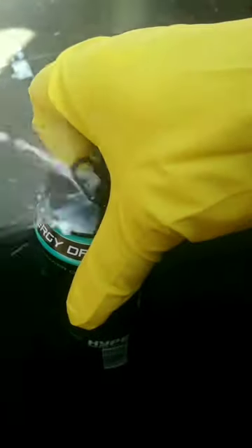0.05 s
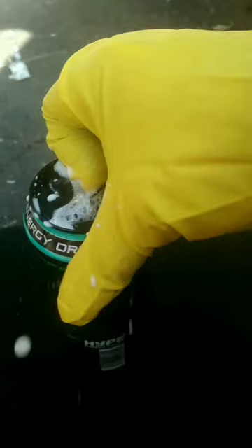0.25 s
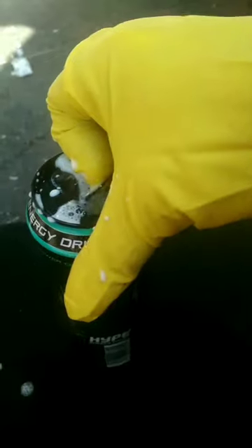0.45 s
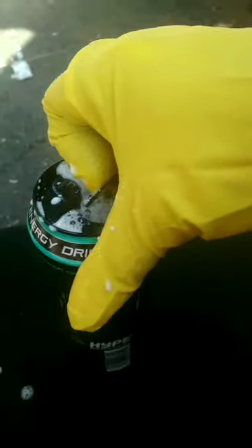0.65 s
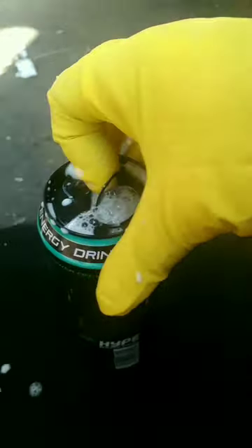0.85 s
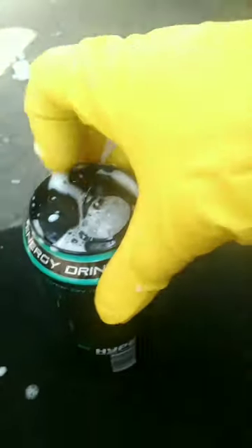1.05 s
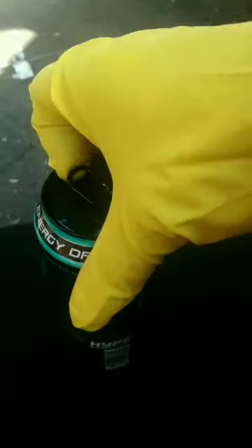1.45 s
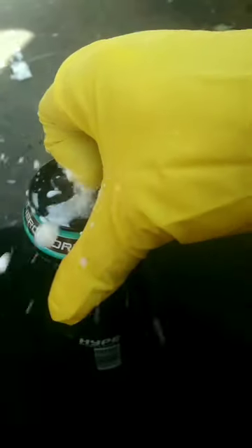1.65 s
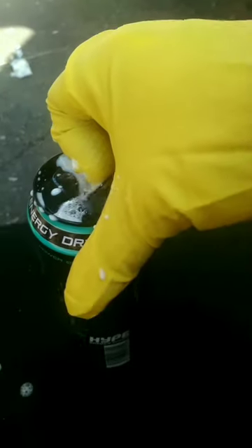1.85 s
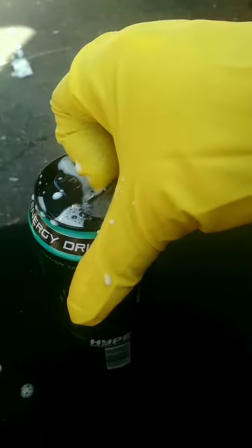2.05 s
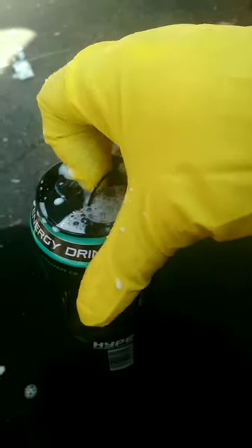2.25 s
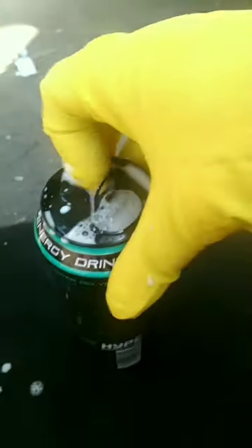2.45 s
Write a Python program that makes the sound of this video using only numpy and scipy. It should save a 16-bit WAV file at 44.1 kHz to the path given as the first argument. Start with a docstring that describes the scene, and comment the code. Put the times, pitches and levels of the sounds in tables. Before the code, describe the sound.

A drink can cracks open close to the microphone at about 0.2 seconds. Gas hisses out and buffets the microphone for a tenth of a second, and the tab gives way with a hollow knock and a tick around 0.3 seconds. Foam then fizzes faintly on the lid. The same opening repeats at about 1.7 seconds, followed by more soft fizz, over a faint low room hum.

```python
"""A low hum and faint room air, then a sharp crack: a gloved hand opens a can of fizzy drink close to
the microphone. The seal snaps, gas hisses through the slit and buffets both microphone ports for a
tenth of a second, and the tab gives way with a hollow knock and a tick. Foam then fizzes on the lid,
with a few faint hollow swells farther back in the room. The same opening is heard twice in a row."""
import sys
import numpy as np
from scipy import signal
from scipy.fft import rfft, irfft
from scipy.io import wavfile

SR = 44100
rng = np.random.default_rng(int(sys.argv[2]) if len(sys.argv) > 2 else 0)


def to_wav(s):
    """Save 16-bit WAV."""
    ch = np.atleast_2d(s).T  # columns
    pcm = np.round(np.clip(ch, -1, 1) * 32767)  # PCM
    wavfile.write(sys.argv[1], SR, pcm.astype(np.int16))


N = 114660
T = np.arange(N) / SR
HZ = np.fft.rfftfreq(N, 1 / SR)

# air of the room (frequency [Hz], level [dB])
AIR_SPECTRUM = [(20, 4.5), (70, 4), (130, 8), (250, -2.5), (600, -7.5), (1200, -18.5), (3000, -24)]
# how alike that air is at the two ports (frequency [Hz], correlation [0-1])
AIR_LIKENESS = [(60, 0.94), (300, 0.75), (650, 0.66), (1400, 0.86), (15000, 0.45)]
# the microphone's own hiss (frequency [Hz], level [dB])
MIC_SPECTRUM = [(1000, -8), (2800, -18), (4800, -12), (7000, -8), (9500, 0), (11200, 0), (12500, -6),
                (13700, -13), (15500, -20)]
# hollow swells back in the room (centre [s], half length [s], level [dB], pitch [Hz], glide [Hz/s])
ROOM_SWELLS = [(0.77, .022, -61, 388, 500), (0.81, .022, -63, 590, 900), (0.845, .04, -58, 425, 0),
               (0.915, .033, -54.5, 345, 0), (0.9, .04, -58, 625, 200), (0.87, .028, -62, 690, 300),
               (0.98, .035, -61, 685, -200), (1.08, .03, -66, 350, 0), (1.375, .018, -60, 345, -500),
               (1.42, .016, -59, 290, 0), (1.41, .025, -64, 420, 0)]
# low hum of the room (time [s], level [dB])
HUM_LEVELS = [(0, -71), (0.1, -54.5), (0.2, -56), (0.4, -51), (0.65, -52.5), (0.75, -65), (0.85, -54.5),
              (1.0, -56), (1.08, -67), (1.17, -60.5), (1.24, -63), (1.32, -59.5), (1.51, -58.5)]
# low tone that sinks after the burst (time [s], pitch [Hz], level [dB])
DRONE_PATH = [(0.33, 130, -56), (0.39, 128.3, -55), (0.44, 128, -53), (0.5, 128.5, -48), (0.55, 121.6, -57),
              (0.59, 100.2, -60), (0.72, 93, -63), (0.8, 88, -85)]
# foam on the lid (time [s], level [dB])
FOAM_LEVELS = [(0.2, -90), (0.3, -64), (0.48, -61.5), (0.62, -61.5), (0.82, -59.5), (0.92, -53),
               (1.0, -54.5), (1.11, -52), (1.22, -55), (1.32, -54.5), (1.42, -57.5), (1.51, -60)]
# its bursting bubbles (frequency [Hz], level [dB])
FOAM_SPECTRUM = [(300, -7), (700, -4), (1400, -1), (2200, -9), (3100, -14), (4500, -10), (7000, -9),
                 (9500, 0), (11500, 2), (13000, -3), (15000, -5), (15600, -12)]
# air pushing the diaphragms (centre [s], half length [s], pitch [Hz], level [dB], left-right [dB])
AIR_PUFFS = [(0.209, 0.0058, 90, -31, -14), (0.253, 0.008, 185, -32, -6), (0.282, 0.0055, 86, -27.5, -7)]
# resonances of the can and the cupped hand (frequency [Hz], level [dB], t60 [s])
CAVITY_MODES = [(185, -1, .08), (352, -6, .07), (453, -2, .05), (668, -8, .06), (950, 2, .22),
                (1130, -4, .1), (1400, -5, .05), (1640, -2, .1), (1910, -2, .1)]
# the jet on the microphone ports (frequency [Hz], level [dB])
JET_SPECTRUM = [(25, -17), (55, -7), (85, 7.5), (140, 0), (190, 7.5), (255, 8.5), (330, 10), (500, 5),
                (1000, 5.5), (1900, 2), (2450, -19), (3000, -32), (6000, -55)]
# spurts of spray in the jet (time [s], level [dB], left-right [dB], decay [s])
SPRAY_SPURTS = [(0.234, -59, -41, 0.00089), (0.2762, -27.5, 24, 0.0019), (0.29, -23.5, 12, 0.0028)]
# that spray at the microphone (frequency [Hz], level [dB])
SPRAY_SPECTRUM = [(40, -25), (250, -14), (450, 3), (700, -6.5), (900, -3), (1300, 7.5), (1700, 2.5),
                  (2400, -0.5), (5000, -37)]
# gas escaping at the slit (time [s], level [dB])
GAS_LEVELS = [(0.2, -90), (0.2017, -60), (0.204, -28.5), (0.215, -26), (0.247, -24.5), (0.262, -29),
              (0.29, -28.5), (0.315, -36.5), (0.335, -42), (0.36, -54), (0.5, -90)]
# its hiss from close up (frequency [Hz], level [dB])
GAS_SPECTRUM = [(300, -8), (1500, -7), (2400, -6), (3100, -19), (3800, -23), (5400, -18), (6100, -21),
                (7200, -13), (8200, -10), (9700, -5.5), (11800, -6), (13400, -11), (14400, -8.5),
                (15500, -10)]
# narrow resonances of the slit (frequency [Hz], width [Hz], boost [dB])
SLIT_WHISTLES = [(2850, 70, 6), (3560, 80, 14), (4090, 50, 13), (4330, 45, 16), (4520, 35, 16),
                 (4730, 35, 11), (5050, 60, 12), (5448, 40, 15), (5720, 50, 10), (6370, 40, 10),
                 (6875, 70, 11), (7400, 70, 4), (8312, 90, 4), (9805, 40, 5), (10329, 40, 4),
                 (11181, 80, 3)]
# modes of the can as the tab gives way (frequency [Hz], level [dB], t60 [s])
KNOCK_MODES = [(514, 1, 0.037), (669, -4, 0.066), (1808, 4, 0.024)]
# modes of the metal lid (frequency [Hz], level [dB], t60 [s])
LID_MODES = [(3670, -14, .03), (4400, -14, .025), (5780, -3, .025), (9450, 3, .025), (10350, -5, .02),
             (10950, 6, .012), (11500, -3, .015)]
# snaps of the seal, then the tab (time [s], crunch level [dB], left-right [dB], ping level [dB])
LID_SNAPS = [(0.2018, -15.5, -4, -13.5), (0.3206, -17, -11, -31)]
# the crunch of a snap (frequency [Hz], level [dB])
CRUNCH_SPECTRUM = [(500, -26), (2800, -2), (3800, -4), (5800, -3), (7500, -7), (9500, 3), (12500, 1.5),
                   (15500, 6.5)]

REPEAT_S = 1.509297
JET_START_S, JET_RISE_S, JET_END_S = .2025, .004, .295


def amp(db):
    """Decibels to gain."""
    return 10 ** (np.asarray(db) / 20)


def unit(x):
    """Scales to rms 1."""
    return x / np.sqrt(np.mean(x ** 2) + 1e-20)


def pan(db):
    """Left and right gains for a level difference; positive is left."""
    gains = np.array([amp(np.atleast_1d(db) / 2), amp(-np.atleast_1d(db) / 2)])
    return gains / np.sqrt(np.mean(gains ** 2, 0))


def envelope(points):
    """Gain over time from (time [s], level [dB]) points."""
    return amp(np.interp(T, *np.transpose(points)))


def curve(points):
    """Spreads (frequency [Hz], value) points over every frequency."""
    hz, value = np.transpose(points)
    return np.interp(np.log(HZ + 1), np.log(hz), value)


def noise(gain, likeness=0):
    """Stereo noise of rms 1, shaped by a gain per frequency, with a given left-right correlation."""
    left, other = rfft(rng.standard_normal((2, N)))
    right = likeness * left + np.sqrt(1 - likeness ** 2) * other
    return unit(irfft(np.array([left, right]) * gain, N))


def wander(hz):
    """Random drift of rms 1, mostly slower than hz, separate for each side."""
    return noise(np.exp(-(HZ / hz) ** 2))


def clicks(per_s):
    """Randomly timed impulses of either sign, separate for each side."""
    return rng.choice([-1, 1], (2, N)) * (rng.random((2, N)) < per_s / SR)


def ring(modes, age):
    """Struck modes dying away as damped sines."""
    return sum(amp(db - 60 * age / t60) * np.sin(2 * np.pi * hz * age) for hz, db, t60 in modes)


def room_tone():
    """Steady air of the room under the microphone's faint hiss."""
    air = amp(-59.5) * noise(amp(curve(AIR_SPECTRUM)), curve(AIR_LIKENESS))
    mic_hiss = amp(-62.5) * noise(amp(curve(MIC_SPECTRUM)))
    return air + mic_hiss


def swells():
    """Soft, rough hollow tones come and go in the background, some of them gliding."""
    out = np.zeros((2, N))
    for centre, half, db, hz, glide in ROOM_SWELLS:
        tone = np.exp(2j * np.pi * np.cumsum(hz + glide * (T - centre)) / SR)
        roughness = .7 * (wander(hz=40) + 1j * wander(hz=40))
        halo = .8 * (wander(hz=190) + 1j * wander(hz=190))
        bell = np.exp(-((T - centre) / half) ** 2 / 2)
        out += unit((tone * (1 + roughness + halo)).real) * amp(db) * bell
    return out


def low_tones(hum_hz=67.3, waver_hz=2.0):
    """The room's wavering hum, and a sinking tone above it that fades in with the jet."""
    hum_pitch = hum_hz + waver_hz * wander(hz=7.9)[0]
    hum = np.sin(2 * np.pi * np.cumsum(hum_pitch) / SR) * envelope(HUM_LEVELS)
    times, hz, db = np.transpose(DRONE_PATH)
    drone = np.sin(2 * np.pi * np.cumsum(np.interp(T, times, hz)) / SR) * amp(np.interp(T, times, db))
    drone *= np.clip((T - JET_START_S) / (JET_END_S - JET_START_S), 0, 1)
    return np.sqrt(2) * (hum * pan(db=-1.5) + drone * pan(db=-.5))


def room_tail(x, t60_s=.29, low_cut_hz=395):
    """The room returns a short diffuse tail with little bass, well below the close sound."""
    tail = noise(HZ / (HZ + low_cut_hz)) * amp(-60 * T / t60_s) * (T > .004)
    tail /= np.linalg.norm(tail, axis=1, keepdims=True)
    return amp(-15.5) * signal.fftconvolve(x, tail, axes=1)[:, :N]


def near_reflections(x, count=8, latest_s=.008, echo_db=-5):
    """Reflections off the hand and the table comb the sound, differently at each port."""
    delay = latest_s * rng.uniform(.0886, 1, (count, 2, 1))
    signs = rng.choice([-1, 1], delay.shape)
    echoes = (signs * np.exp(-2j * np.pi * HZ * delay)).sum(0) / np.sqrt(count)
    return irfft(rfft(x) * (1 + amp(echo_db) * echoes), N) / np.sqrt(1 + amp(echo_db) ** 2)


def foam(bubbles_per_s=9000):
    """Tiny bubbles of uneven size burst on the lid and merge into a fluttering fizz."""
    size_db = 3 * np.minimum(rng.exponential(1, (2, N)), 6)
    pops = amp(size_db) * clicks(bubbles_per_s)
    fizz = unit(irfft(rfft(pops) * amp(curve(FOAM_SPECTRUM)), N))
    flutter_db = 1.3 * wander(hz=60)[0]
    return fizz * envelope(FOAM_LEVELS) * amp(flutter_db) * pan(db=-1.5)


def puffs(boom_s=.3, boom_hz=102, boom_db=-40.5, boom_t60_s=.44):
    """Slow pushes of air on the diaphragms, then the low ring the burst leaves on the right."""
    out = ring([(boom_hz, boom_db, boom_t60_s)], np.maximum(T - boom_s, 0)) * pan(db=-22)
    for centre, half, hz, db, pan_db in AIR_PUFFS:
        bell = np.exp(-((T - centre) / half) ** 2 / 2)
        out += amp(db) * pan(pan_db) * bell * np.sin(2 * np.pi * hz * (T - centre))
    return np.sqrt(2) * out * np.clip((T - JET_START_S) / JET_RISE_S, 0, 1)


def cavity(x):
    """Adds the hollow ringing of the can and the hand cupped around it."""
    modes = sum(amp(db) / (1 + 2j * np.pi * (HZ - hz) * t60 / np.log(1000))
                for hz, db, t60 in CAVITY_MODES)
    return irfft(rfft(x) * (1 + modes), N)


def jet(fall_db_per_s=1000, drift_db_per_s=35):
    """Lumpy turbulence hits the microphone, mostly the right port, drifting a little toward centre."""
    age = np.clip(T - JET_START_S, 0, JET_END_S - JET_START_S)
    rise = np.minimum(age / JET_RISE_S, 1)
    level_db = -27.5 - fall_db_per_s * np.maximum(T - JET_END_S, 0)
    wind = noise(amp(curve(JET_SPECTRUM)))
    lumps_db = 2.5 * wander(hz=201)
    return wind * rise * amp(level_db + lumps_db) * pan(-11 + drift_db_per_s * age)


def spray():
    """Brief spurts of spray in the jet: a faint one on the right, then two on the left."""
    out = np.zeros((2, N))
    for start, db, pan_db, decay_s in SPRAY_SPURTS:
        progress = np.maximum(T - start, 0) / decay_s
        burst = 2 * np.sqrt(progress) * np.exp(-progress)
        out += noise(amp(curve(SPRAY_SPECTRUM)), likeness=.12) * amp(db) * pan(pan_db) * burst
    return out


def gas_hiss(spit_s=.3075, spit_decay_s=.015, spit_hz=5760, spit_width_hz=4800):
    """Gas sputters through the slit, sounding its resonances, and ends in a spit of spray."""
    whistles = 1 + sum((amp(db) - 1) / (1 + (2 * (HZ - hz) / width) ** 2)
                       for hz, width, db in SLIT_WHISTLES)
    sputter_db = 2 * wander(hz=200)
    gas = noise(amp(curve(GAS_SPECTRUM)) * whistles) * envelope(GAS_LEVELS)
    spit_band = 1 / (1 + (2 * (HZ - spit_hz) / spit_width_hz) ** 2)
    progress = np.maximum(T - spit_s, 0) / spit_decay_s
    spit = noise(spit_band) * amp(-50.5) * progress * np.exp(1 - progress)
    return (gas + spit) * amp(sputter_db) * pan(db=.5)


def tab_knock(start_s=.2903, rise_s=.0022):
    """The tab gives way and the can answers with a short hollow note."""
    age = np.maximum(T - start_s, 0)
    return amp(-18) * pan(db=3) * np.minimum(age / rise_s, 1) * ring(KNOCK_MODES, age)


def seal_tear(decay_s=.0033):
    """From the first snap, tiny tears run along the score line and ring the lid."""
    start, _, pan_db, _ = LID_SNAPS[0]
    age = np.maximum(T - start, 0)
    tears = unit(clicks(per_s=24000)) * np.exp(-age / decay_s) * (age > 0)
    lid = ring(LID_MODES, T[T < .06])
    lid /= np.linalg.norm(lid)
    return amp(-25.5) * pan(pan_db) * signal.oaconvolve(tears, lid[None], axes=1)[:, :N]


def lid_snaps(crunch_s=.00073, ping_hz=11000, ping_s=.0004):
    """Close up, the seal cracks and the tab ticks: each a crunch and a ping of the lid's top ring."""
    out = np.zeros((2, N))
    for start, crunch_db, pan_db, ping_db in LID_SNAPS:
        age = np.maximum(T - start, 0)
        burst = np.exp(-(age / crunch_s) ** 2) * (T > start)
        crunch = amp(crunch_db) * noise(amp(curve(CRUNCH_SPECTRUM))) * burst
        ping = amp(ping_db) * age / ping_s * np.exp(1 - age / ping_s) * np.sin(2 * np.pi * ping_hz * age)
        out += pan(pan_db) * (crunch + ping)
    return out


def scene():
    """The can close to the microphone and the room behind it; one opening, repeated."""
    can = seal_tear() + lid_snaps() + near_reflections(gas_hiss()) + cavity(jet() + spray()) + tab_knock()
    once = can + room_tail(can) + puffs() + near_reflections(foam())
    once += low_tones() + room_tone() + swells()
    return once[:, np.arange(N) % round(REPEAT_S * SR)]


def record(dry, cutoff_hz=15520):
    """The recorder's band limit cuts off the highest treble."""
    taps = signal.firwin(511, cutoff_hz, window=("kaiser", 9), fs=SR)
    return signal.oaconvolve(dry, taps[None], "same")


dry = scene()
out = record(dry)
to_wav(out)
```